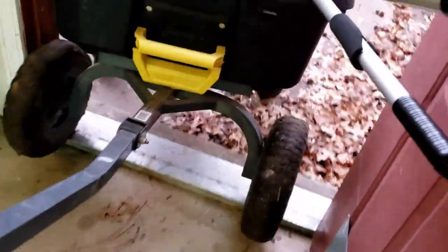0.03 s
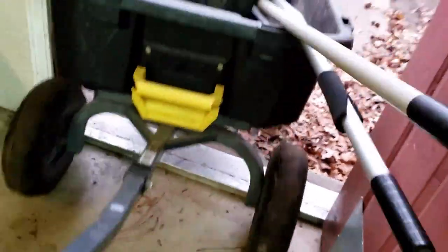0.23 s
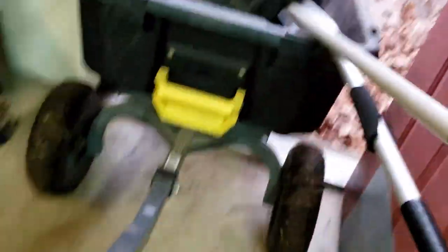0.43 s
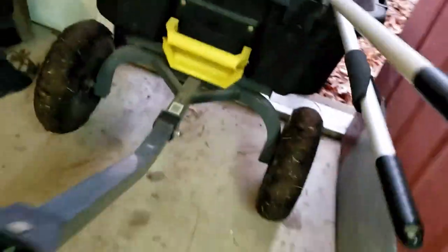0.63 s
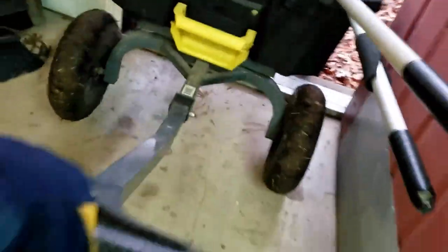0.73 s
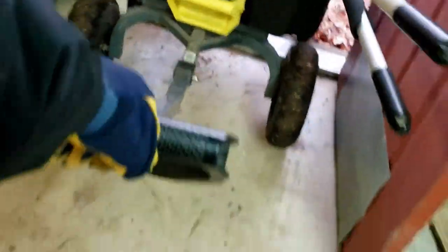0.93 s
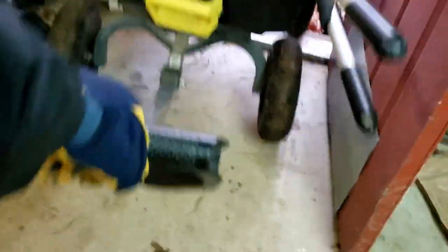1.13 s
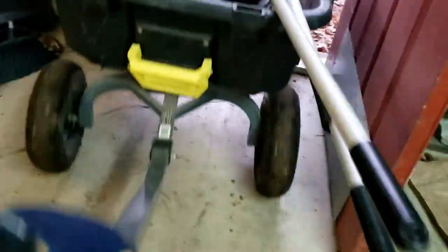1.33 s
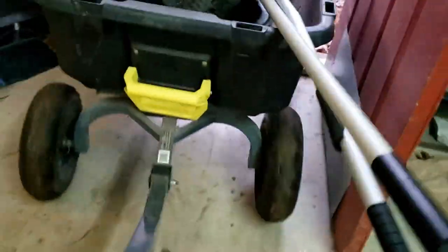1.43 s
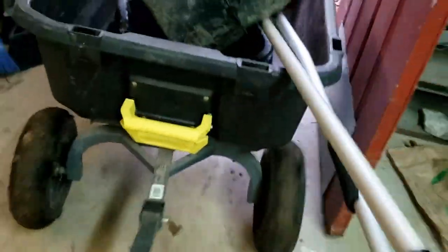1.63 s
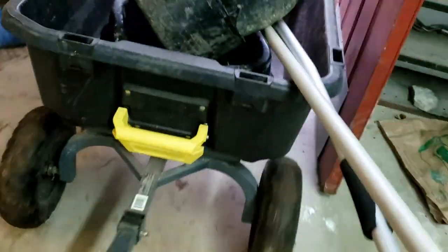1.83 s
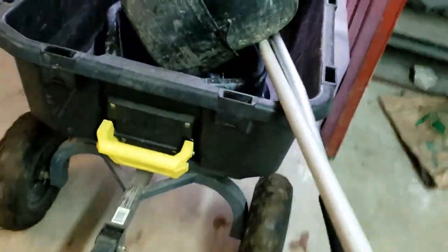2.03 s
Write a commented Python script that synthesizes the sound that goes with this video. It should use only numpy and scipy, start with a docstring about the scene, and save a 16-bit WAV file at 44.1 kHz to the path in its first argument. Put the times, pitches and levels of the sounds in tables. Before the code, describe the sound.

Close by in a barn, a rolling plastic cart rattles with uneven hollow booms, metal clacks and clinking tools over tyre rumble and faint leaf crackle. The knocks build to one hard bang, then thin out.

```python
"""At the door of a barn, a plastic dump cart is pulled over the threshold onto the concrete floor.
Each jolt excites the normal modes of the hollow tub, which booms and rings, while the frame clacks or
bangs and long-handled tools and loose fittings clink. The tyres rumble, leaves and grit crackle, and
a handle rubs briefly along the tub. The knocks and clatter reverberate in the short, dull barn echo."""
import sys
import numpy as np
from scipy import signal
from scipy.fft import rfft, irfft
from scipy.io import wavfile
from scipy.ndimage import uniform_filter1d

SR = 44100
rng = np.random.default_rng(int(sys.argv[2]) if len(sys.argv) > 2 else 0)


def master(y):
    """Save y as 16-bit WAV."""
    cut = np.clip(np.atleast_2d(y).T, -1, 1)
    pcm = np.round(cut * 32767)  # scale
    wavfile.write(sys.argv[1], SR, pcm.astype(np.int16))


N = 92610
T = np.arange(N) / SR
HIT = T[:8192]  # time axis of one impact

# Jolts of the cart. Each row: start in seconds, relative boom level in dB, relative ring level in dB,
# frequency the tub favours in Hz, relative clack level in dB.
JOLTS = [(0.001, -28, -28, 260, -40), (.199, -23.5, -17.5, 252, -32), (.247, -25, -26, 267, -37),
         (.318, -27.5, -23, 280, -36), (.447, -13.5, -24.5, 347, -29.5), (0.485, -21.5, -17, 290, -36.5),
         (0.524, -48, -13.5, 257, -25.5), (.535, -41, -15, 265, -26.5), (.549, -20, -6, 260, -43),
         (0.581, -38, -22, 310, -33.5), (.600, -34, -15, 258, -24.5), (.620, -23, -30, 270, -29.5),
         (.708, -21.5, -29, 296, -24.5), (.768, -17.5, -16.5, 367, -30), (.813, -24, -25, 370, -25),
         (.826, -54, -11, 358, -31), (0.916, -24.5, -19.5, 320, -48), (1.004, -23, -19.5, 297, -40),
         (1.062, -23, -21, 292, -60), (1.123, -31, -20, 370, -34.5), (1.154, -24, -17.5, 360, -32),
         (1.216, -23.5, -22, 275, -34.5), (1.262, -21, -12, 367, -28), (1.303, -20.5, -18, 270, -31.5),
         (1.377, -40, -11, 410, -28), (1.447, -25, -24, 340, -36), (1.488, -32, -15.5, 310, -22.5),
         (1.510, -7, -17.5, 287, -14.5), (1.528, -8, -7.5, 274, -18), (1.556, -34, -13, 298, -30),
         (1.585, -16.5, -8.5, 385, -24), (1.619, -17, -12, 380, -32), (1.650, -19, -38, 330, -31.5),
         (1.677, -45, -17, 390, -21.5), (1.755, -25, -18.5, 364, -33), (1.973, -26.5, -28.5, 270, -36.5),
         (2.038, -35, -20, 307, -40)]
# Bright spectrum of clinks and crackle. Each row: frequency in Hz, relative spectral level in dB.
BRIGHT_SPECTRUM = [(600, -49), (2000, -5.5), (3200, 0.5), (4800, 5.5), (7800, -2.5), (11000, 3), (13000, 1),
                   (16000, -3)]


def from_db(db):
    """Amplitude grows tenfold for every 20 dB."""
    return 10 ** (np.asarray(db) / 20)


def at_hz(points, hz):
    """Interpolation on a logarithmic frequency axis, where all octaves are equally wide."""
    frequencies, values = np.transpose(points)
    return np.interp(np.log(np.maximum(hz, 1)), np.log(frequencies), values)


def unit(x):
    """Normalisation to unit energy, the sum of the squared samples."""
    return x / np.sqrt(np.sum(x ** 2, axis=-1, keepdims=True) + 1e-20)


def through(x, response):
    """A linear system convolves its input with its impulse response."""
    return signal.fftconvolve(np.atleast_2d(x), np.atleast_2d(response), axes=-1)[:, :x.shape[-1]]


def colour(spectrum, uneven_db=0):
    """Minimum-phase impulse response of a spectrum; uneven_db adds random peaks and dips."""
    size = len(HIT)
    hz = np.fft.rfftfreq(size, 1 / SR)
    ripple = np.c_[np.geomspace(400, 16000, 110), rng.standard_normal(110)]
    db = at_hz(spectrum, hz) + uneven_db * at_hz(ripple, hz)
    cepstrum = irfft(np.log(from_db(db)))
    cepstrum[1:size // 2] *= 2  # folding onto positive time makes the response causal
    cepstrum[size // 2 + 1:] = 0
    return irfft(np.exp(rfft(cepstrum)))


def ring(modes):
    """Modal superposition: a struck body sounds as a sum of damped sines, here of alternating sign."""
    return unit(sum((-1) ** k * from_db(db - 60 * HIT / t60) * np.sin(2 * np.pi * hz * HIT)
                    for k, (hz, db, t60) in enumerate(modes)))


def ring_around(modes, favoured_hz, db_per_octave=20.5):
    """Selective excitation: where a blow lands decides which modes answer most."""
    return ring([(hz, db - db_per_octave * abs(np.log2(hz / favoured_hz)), t60)
                 for hz, db, t60 in modes])


def contacts(per_s, size, spread_db=0):
    """Shot noise: tiny contacts at random instants, as mid and side signals of rms 1."""
    strength = from_db(spread_db * np.minimum(rng.exponential(1, (2, size)), 4))
    polarity = rng.choice([-1, 1], (2, size))
    touching = rng.random((2, size)) < per_s / SR
    return unit(strength * polarity * touching) * np.sqrt(size)


def blow(start_s, db, body, decay_s, attack_s, first, window_s):
    """Impact excitation: a first contact, of relative strength first, and its chatter drive a body."""
    per_s = 3000
    envelope = np.exp(-HIT / decay_s) * (1 - np.exp(-HIT / attack_s))
    chatter = contacts(per_s, len(HIT), spread_db=1.5) * envelope
    chatter[0, 0] += first * np.sqrt(SR / per_s)
    sound = through(chatter, body)
    power = uniform_filter1d(sound ** 2, int(window_s * SR), axis=-1, mode="constant")
    loudest = np.sqrt(power.max(axis=-1, keepdims=True) + 1e-20)  # highest rms over window_s
    return np.pad(from_db(db) * sound / loudest, [(0, 0), (int(start_s * SR), N)])[:, :N]


def tyre_rumble():
    """Rolling noise: tread and grit shake the cart with a dense stream of small contacts."""
    # Each row: frequency in Hz, relative spectral level in dB.
    spectrum = [(25, -28), (60, -7), (135, -4.5), (210, 0), (270, 5.5), (315, 2.5), (372, 0.5), (470, -2),
                (800, -13.5), (2200, -27.5), (4500, -32.5), (16000, -47.5)]
    # Each row: time in seconds, level in dB.
    levels = [(0, -28.5), (.17, -41), (.25, -18), (.41, -33), (.55, -21.5), (.9, -24), (1.1, -23),
              (1.45, -20.5), (1.65, -18), (1.85, -25), (2.1, -30.5)]
    rumble = through(contacts(per_s=2500, size=N), unit(colour(spectrum)))
    return rumble * from_db(np.interp(T, *np.transpose(levels)))


def tub_boom():
    """Free vibration: the loaded tub bounces on its tyres and booms in its lowest modes."""
    # Each row: frequency in Hz, relative level in dB, time to decay by 60 dB in seconds.
    low_modes = [(60.5, -19.5, 0.092), (101.5, -7.5, 0.095), (138.8, -0.5, 0.15), (182.7, -1.5, 0.13)]
    body, lag_s = ring(low_modes), 0.0055
    return sum(blow(s + lag_s, db - 1.5, body, decay_s=0.011, attack_s=0.00092, first=3.2, window_s=0.02)
               for s, db, *_ in JOLTS)


def tub_ring():
    """Wall resonance: the plastic rings at every jolt, each time around another pitch."""
    # Each row: frequency in Hz, relative level in dB, time to decay by 60 dB in seconds.
    wall_modes = [(240.6, -3, 0.069), (263.8, 0.5, 0.25), (300, 4.5, 0.082), (334, 1, 0.1),
                  (374.5, 1, 0.18), (412.6, 4.5, 0.087), (446, -6, 0.17), (513.3, -3.5, 0.14),
                  (600, 4, 0.17), (683, 8.5, 0.05)]
    return sum(blow(s, db - 0.5, ring_around(wall_modes, hz),
                    decay_s=0.0064, attack_s=0.00026, first=8.8, window_s=0.014)
               for s, _, db, hz, _ in JOLTS)


def frame_clack():
    """Backlash: axles, hitch and handles knock in their play, each with resonances of its own."""
    # Each row: frequency in Hz, relative spectral level in dB.
    spectrum = [(200, -14), (550, 8.5), (800, 1.5), (1300, -3), (1800, -6.5), (2600, -8.5), (4500, -19),
                (7500, -37), (16000, -61)]
    return sum(blow(s, db + 4, colour(spectrum, uneven_db=3.5),
                    decay_s=0.014, attack_s=0.007, first=1, window_s=0.012)
               for s, *_, db in JOLTS)


def tool_clinks():
    """Contact chatter: tools and loose fittings rattle in bright, well-damped bursts, no two alike."""
    # Each row: start in seconds, relative level in dB, decay time of the chatter in seconds.
    clinks = [(0.035, -45.5, 0.0042), (0.197, -25, 0.008), (.25, -43, 0.012), (0.451, -35.5, 0.049),
              (0.482, -39, 0.0048), (.536, -32, 0.015), (0.551, -31.5, 0.005), (0.6, -29.5, 0.017),
              (.614, -34, 0.0055), (0.705, -28, 0.013), (.713, -30.5, 0.018), (0.808, -33.5, 0.015),
              (0.924, -40, .025), (1.148, -35.5, 0.0068), (1.19, -38, 0.0037), (1.201, -39, 0.0095),
              (1.246, -29, 0.0074), (1.286, -39, 0.02), (1.374, -41, 0.0037), (1.464, -46, 0.0044),
              (1.485, -29.5, 0.011), (1.497, -28, 0.018), (1.510, -21.5, 0.0045), (1.52, -28, 0.019),
              (1.649, -30.5, 0.012), (1.678, -34.5, 0.0068), (1.739, -41, 0.0086), (1.976, -47, 0.0039)]
    return sum(blow(s, db + 3, colour(BRIGHT_SPECTRUM, uneven_db=4),
                    decay_s, attack_s=0.0061, first=0.47, window_s=0.0044)
               for s, db, decay_s in clinks)


def leaf_crackle():
    """Sparse shot noise: dry leaves and grit tick under the tyres, less once the cart is indoors."""
    # Each row: time in seconds, level in dB.
    levels = [(.18, -61), (.25, -52), (.9, -46.5), (2.1, -57.5)]
    ticks = through(contacts(per_s=350, size=N), unit(colour(BRIGHT_SPECTRUM)))
    return ticks * from_db(np.interp(T, *np.transpose(levels)))


def frame_bangs():
    """Impulse response: hard jolts drive the steel frame against its stops, and it rings briefly."""
    # Each row: start in seconds, level in dB, frequency the frame favours in Hz.
    bangs = [(0.449, -25, 900), (0.536, -21.5, 1060), (.607, -21.5, 1230), (1.304, -28.5, 1540),
             (1.511, -15, 1600)]
    # Each row: frequency in Hz, relative level in dB, time to decay by 60 dB in seconds.
    steel_modes = [(904, 7.5, 0.044), (1161, 4, 0.052), (1315, -4, 0.12), (1899, 4, 0.033),
                   (2436, 0, 0.064), (3675, 19, 0.02)]
    return sum(blow(s, db, ring_around(steel_modes, hz),
                    decay_s=0.0064, attack_s=0.00026, first=8.8, window_s=0.011)
               for s, db, hz in bangs)


def handle_rub(start_s=0.96, end_s=1.102, fade_s=0.041):
    """Sliding friction: a tool handle scrapes the tub, its dense slips driving reedy resonances."""
    # Each row: frequency in Hz, relative spectral level in dB.
    spectrum = [(400, -23), (800, 12), (1200, 4), (1700, -13), (2250, 11.5), (3200, -16), (9000, -26)]
    stroke = np.clip(np.minimum(T - start_s, end_s - T) / fade_s, 0, 1)
    slips = contacts(per_s=2500, size=N) * stroke
    return through(slips, unit(colour(spectrum))) * from_db(-38)


def barn_response():
    """Diffuse reverberation: noise in bands about an octave wide, each dying at its own rate."""
    # Each row: frequency in Hz, reverberation time in seconds.
    decay_times = [(100, 0.99), (400, 0.34), (1500, 1), (5000, 0.6), (15000, 0.32)]
    t, edges_hz = T[:SR], np.geomspace(40, 18000, 10)
    build_up = 1 - np.exp(-t / 0.00097)
    response = 0
    for low, high in zip(edges_hz, edges_hz[1:]):
        bandpass = signal.butter(2, [low, high], "band", fs=SR, output="sos")
        band = signal.sosfilt(bandpass, rng.standard_normal((2, SR)))
        decay = from_db(-60 * t / at_hz(decay_times, np.sqrt(low * high)))
        response += unit(band * decay * build_up) * np.sqrt(2 * (high - low) / SR)
    return response


def moving_echo(x, step_s=0.15):
    """A moving source meets ever new patterns of reflections, joined by equal-power crossfades."""
    centres_s = np.arange(0, T[-1] + step_s, step_s)
    fades = (np.sqrt(np.maximum(1 - abs(T - s) / step_s, 0)) for s in centres_s)
    return sum(through(x * fade, barn_response()) for fade in fades)


def scene():
    """Superposition of the cart and its echo, narrow in the bass and wide in the treble."""
    # Stereo width. Each row: frequency in Hz, gain of the side signal in dB.
    width = [(30, -27), (180, -19.5), (350, -14), (700, -7.5), (1400, -2.5), (2800, -0.5), (6000, .5)]
    # Each row: direct sound, gain into the echo in dB.
    layers = [(tub_boom(), -3.5),
              (tub_ring(), -6),
              (frame_clack() + frame_bangs() + handle_rub(), -4.5),
              (tool_clinks() + leaf_crackle(), -3.5)]
    echo = moving_echo(sum(x * from_db(db) for x, db in layers))
    mid, side = sum(x for x, _ in layers) + echo + tyre_rumble()
    side = through(side, colour(width))[0]
    lean_left = from_db(0.36)
    return np.array([(mid + side) * lean_left, (mid - side) / lean_left])


def record(dry):
    """Band limiting and soft saturation: the deepest bass and the top are cut, loud peaks flattened."""
    low_cut = signal.butter(1, 14, "high", fs=SR, output="sos")
    high_cut = signal.ellip(12, .1, 80, 16000, fs=SR, output="sos")
    trimmed = signal.sosfilt(low_cut, dry)
    saturated = trimmed / (1 + trimmed ** 6) ** (1 / 6)
    return signal.sosfilt(high_cut, saturated)


dry = scene()
out = record(dry)
master(out)
```